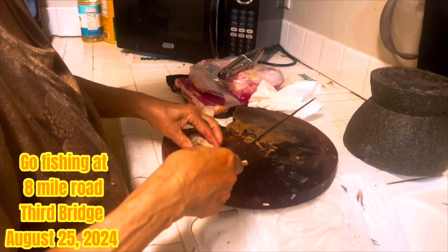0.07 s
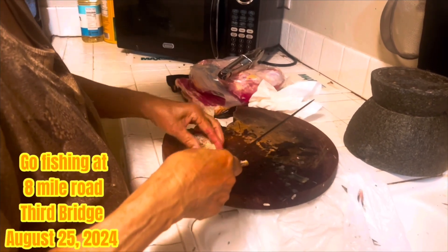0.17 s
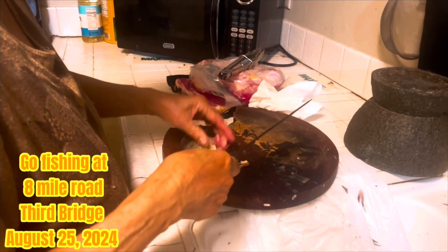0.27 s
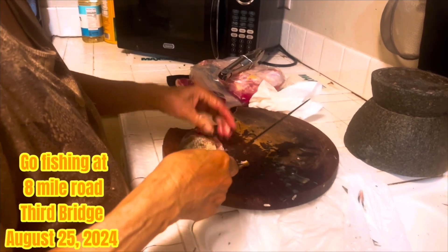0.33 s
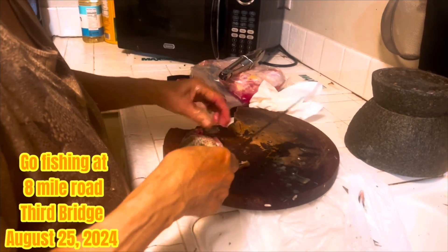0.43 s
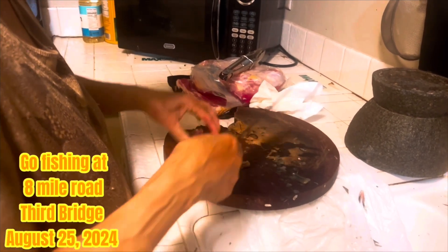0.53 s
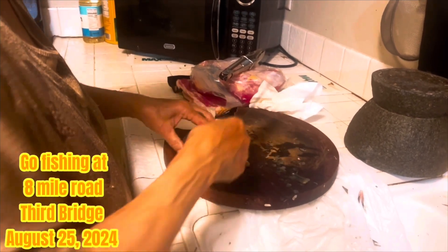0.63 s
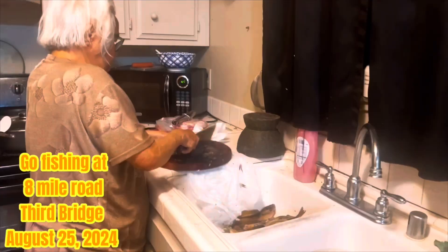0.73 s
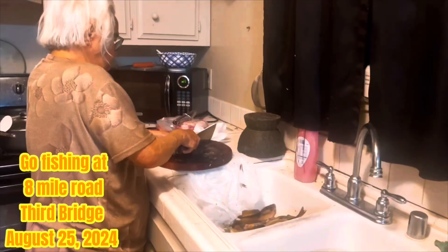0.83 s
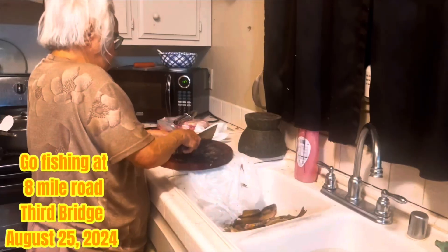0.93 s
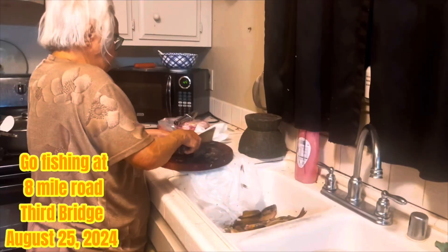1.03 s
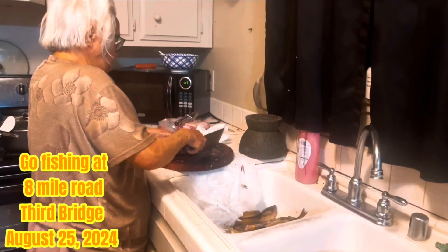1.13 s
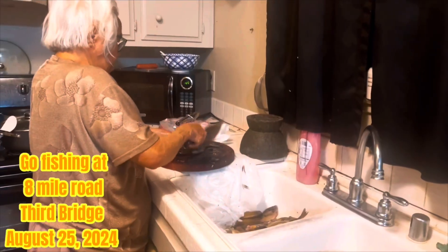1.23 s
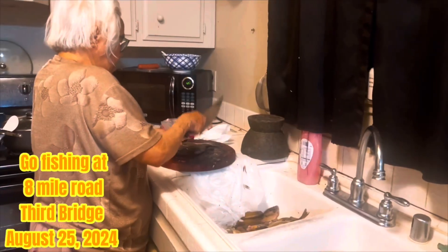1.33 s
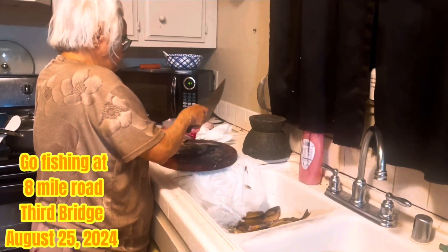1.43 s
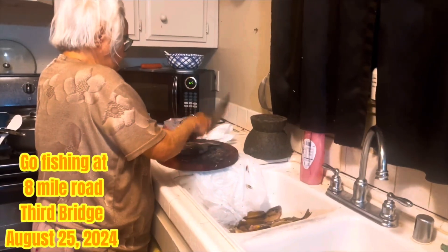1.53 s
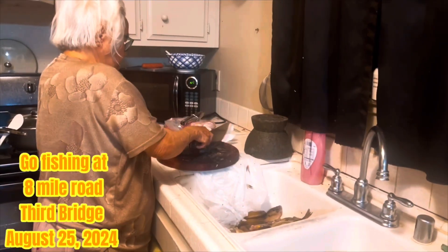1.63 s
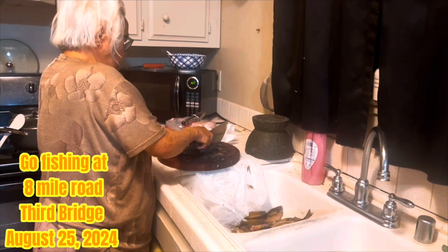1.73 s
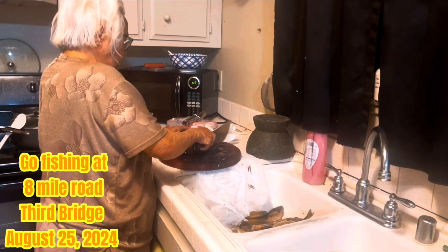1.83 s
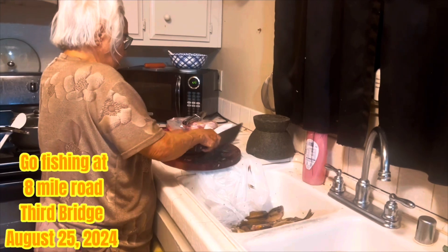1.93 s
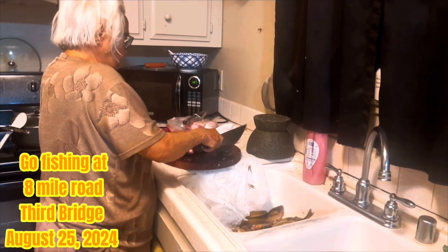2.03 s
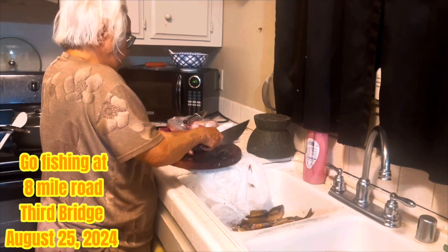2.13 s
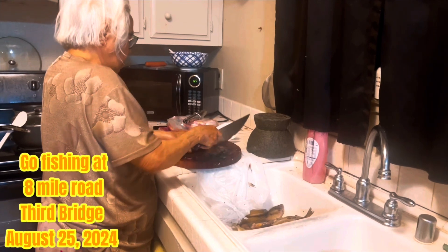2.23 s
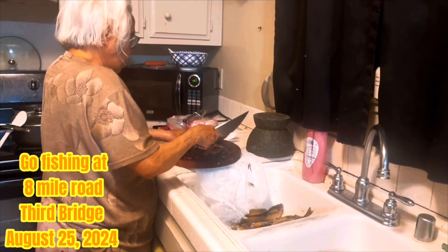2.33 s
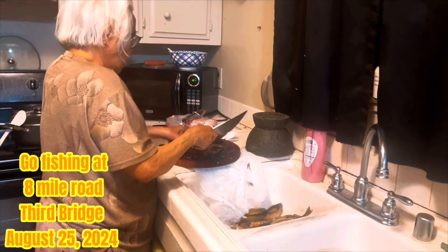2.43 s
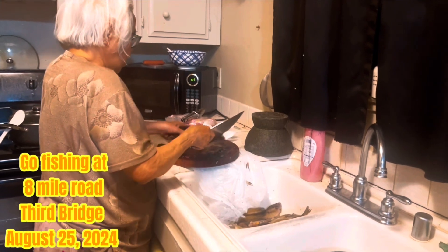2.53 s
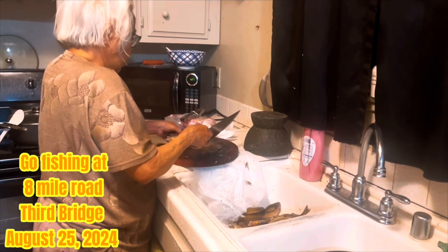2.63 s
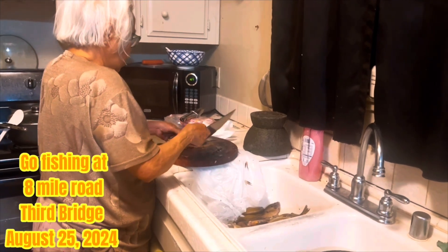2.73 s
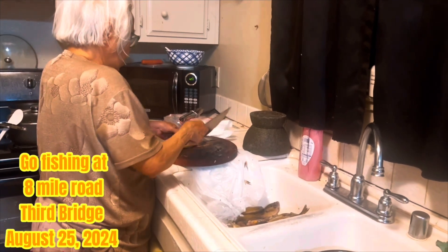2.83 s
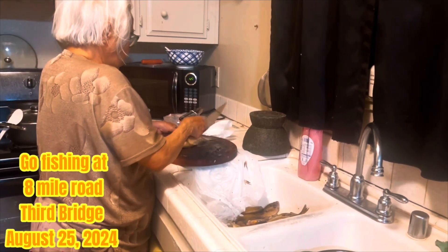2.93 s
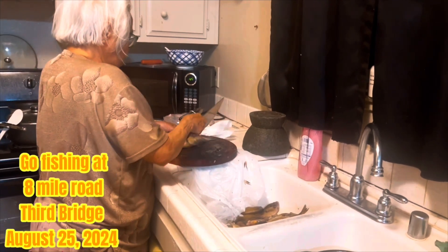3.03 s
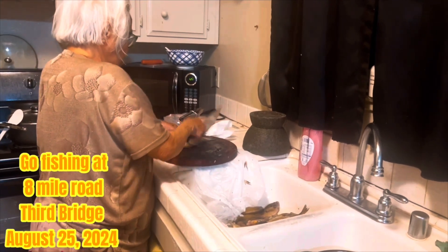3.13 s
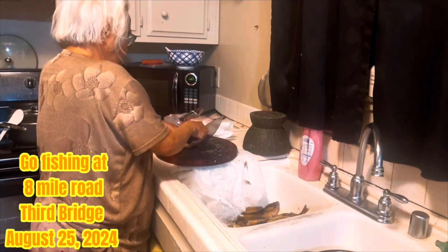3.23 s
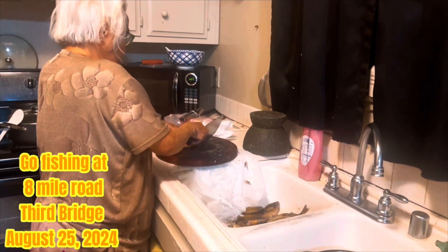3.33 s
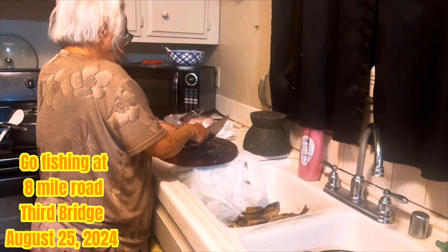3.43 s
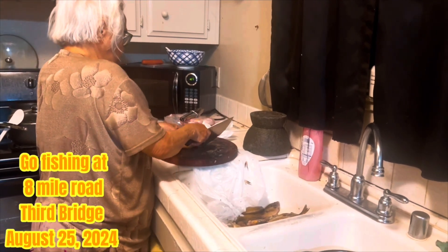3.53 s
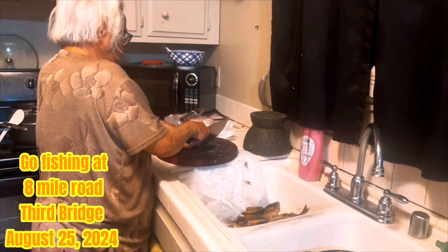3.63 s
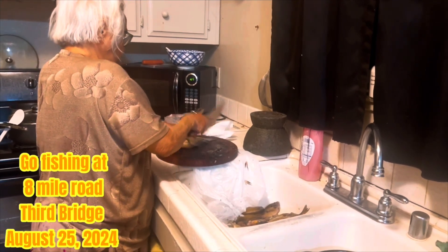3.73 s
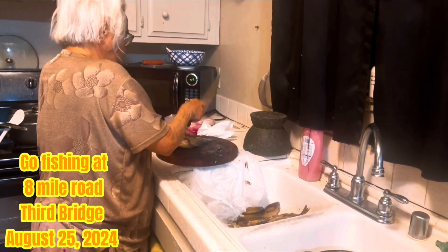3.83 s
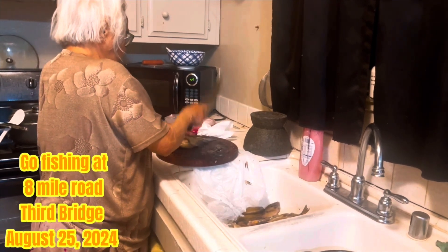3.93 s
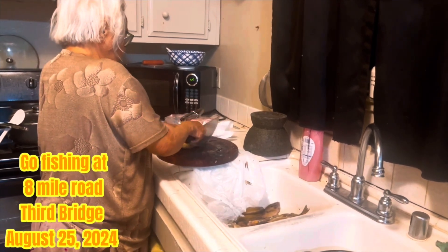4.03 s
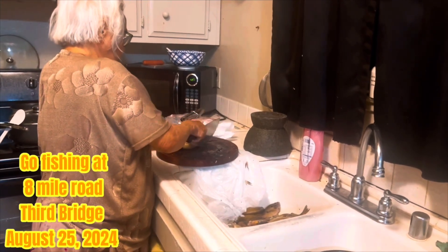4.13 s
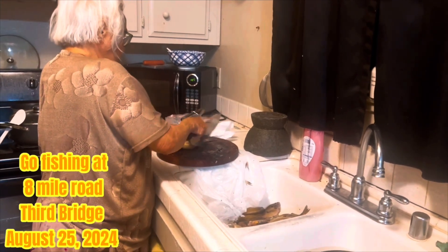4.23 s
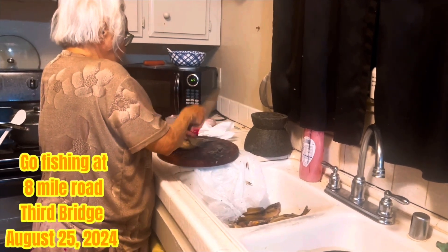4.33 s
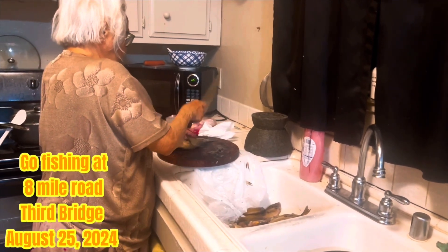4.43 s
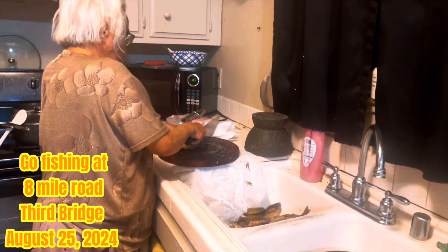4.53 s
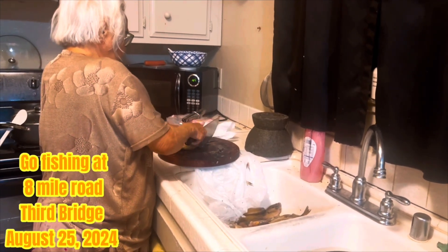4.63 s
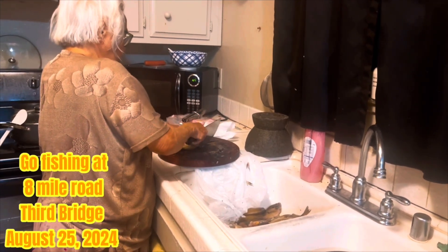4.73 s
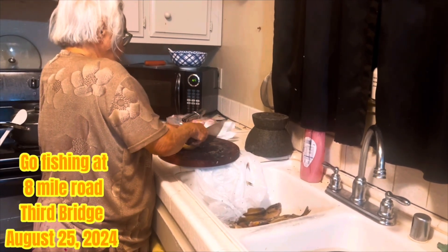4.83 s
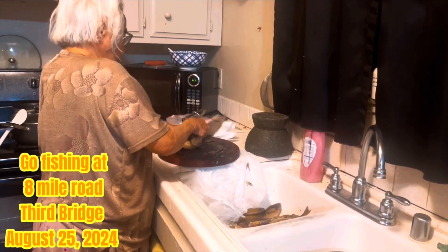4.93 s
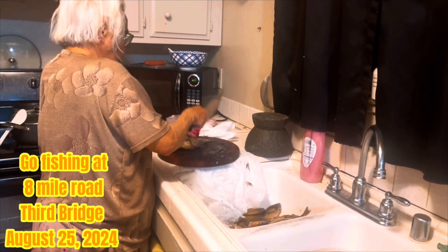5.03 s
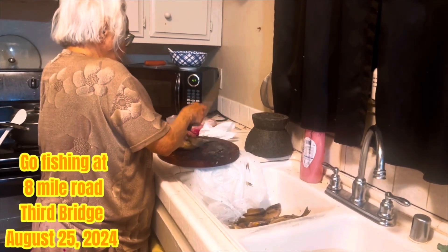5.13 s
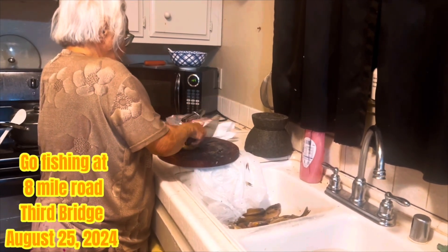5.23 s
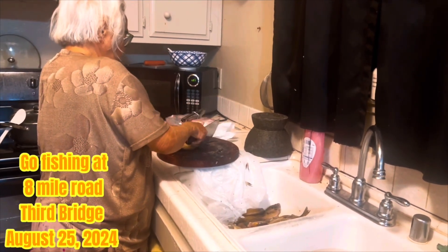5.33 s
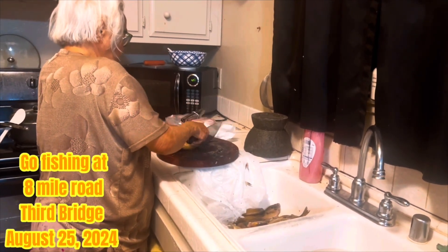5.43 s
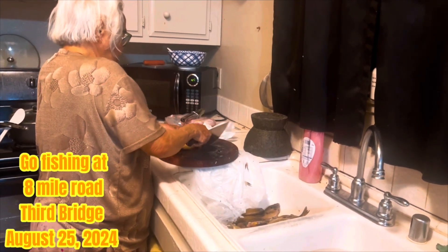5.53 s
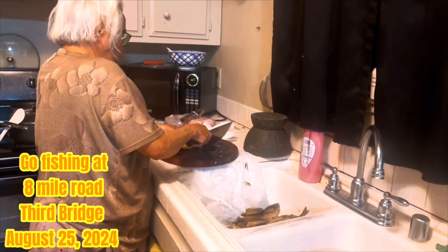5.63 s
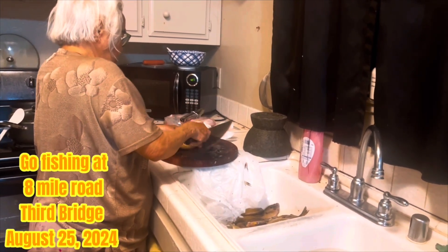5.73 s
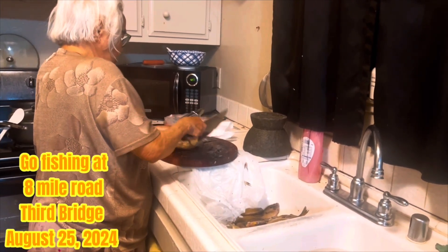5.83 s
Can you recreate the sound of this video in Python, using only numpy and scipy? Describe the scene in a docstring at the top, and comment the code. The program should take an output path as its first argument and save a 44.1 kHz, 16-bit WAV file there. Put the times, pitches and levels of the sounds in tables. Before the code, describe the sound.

Two faint, wet swishes open the sound as a hand slides small fish over a wooden board. At about 0.8 seconds a kitchen knife lands a moderate chop, and at 1.6 seconds a much harder one. Each blow is a tiny crunch of skin and bone with a sharp wooden knock and a counter thud, leaving dishes faintly ringing. A lull follows, with a few light touches around 2.5 seconds. A softer, duller chop comes at 3.1 seconds, then three loud ones at 4.0, 4.5 and 5.2 seconds. Shortly after each blow the blade scrapes the wood quietly with a thin, gritty rasp, longest at about 5.5 seconds. Everything is heard close, with the short, hard echo of a small tiled kitchen. Underneath lie a faint low rumble that rises with each blow and a very soft hiss.

```python
"""In a small tiled kitchen a hand slides small fish over a wet, round wooden board in two soft swishes.
Then a knife chops six times: each blow crunches through skin and bone, knocks the board, thumps the
counter and leaves the things on it ringing. After each blow the blade scrapes the wood, sticking and
slipping; knife and fingers touch down lightly in the gaps. Under it all lie a low rumble, stirred up
by every blow, and a faint hiss that swells twice."""
import sys
import numpy as np
from scipy import signal
from scipy.io import wavfile

SR = 44100
rng = np.random.default_rng(int(sys.argv[2]) if len(sys.argv) > 2 else 0)


def transcribe(signal):
    """Save signal, clipped to [-1, 1], as a 16-bit WAV file at the path in sys.argv[1]."""
    frames = np.atleast_2d(signal).T
    limited = np.clip(frames, -1, 1)
    pcm = np.round(limited * 32767).astype(np.int16)
    wavfile.write(sys.argv[1], SR, pcm)


N = 258867
TIME = np.arange(N) / SR
BANDS = 31.25 * 2 ** (np.arange(28) / 3)   # third-octave centres in Hz

# The knife blows. Each row: start in seconds, seconds through the fish, force in dB, trims in dB for
# counter thud, board body, wooden knock and bone snap, snap pitch in Hz, then trims in dB for
# steel edge, room and after-ring.
BLOWS = [(0.7605, 0.0033, -13.5, -1.5, -3.5, -3.5, -1, 2690, -7.5, 3, 18.5),
         (1.565, 0.0072, -1.5, -3.5, -2.5, -6, 2, 1900, -7, 1, 3.5),
         (3.1490, 0.0064, -13, 10.5, 4, -2.5, -2, 2230, -1, 1, 0),
         (3.9877, 0.0022, -0.5, 3, 6, -0.5, -2, 2327, 3, 1.5, 1),
         (4.5128, 0.0031, -1.5, 2, 1, -0.5, 0, 2446, -1, 1, 4.5),
         (5.2206, 0.0012, 0, -4, -1, -5.5, 0.5, 3053, -8.5, 3, 2.5)]
# The stereo image of the two microphone ports. Each row: frequency in Hz, left-right likeness
# from 0 to 1, left minus right in dB.
STEREO_IMAGE = [(60, 1, 0.5), (200, 0.95, 2.6), (500, 0.75, 1.5), (1200, 0.6, 1.5), (2210, .9, -0.17),
                (4000, .94, -0.9), (7000, 0.97, 0), (15000, 0.97, 1)]


def chopping(bands, crunch_db=-20, crunch_rise_db=16):
    """The edge crunches through skin and bone, swelling for a few milliseconds, then hits the board."""
    # Skin and bone giving way. Each row: frequency in Hz, relative level in dB per third octave.
    crunch_colour = [(200, -32), (1000, -6.5), (2200, 1.5), (4500, -6.5), (8000, -2), (11500, -2.5),
                     (16000, -7)]
    crunch = coloured(bands, crunch_colour)
    out, length = np.zeros((2, N)), int(1.6 * SR)
    for s, through_s, force_db, *tone in BLOWS:
        start, cut = round(s * SR), max(round(through_s * SR), 1)
        bite = from_db(force_db + crunch_db + np.linspace(-crunch_rise_db, 0, cut))
        add(out, s, bite * crunch[:, start:start + cut])
        add(out, s + through_s, from_db(force_db) * board_hit(bands[..., start:start + length], *tone))
    return out


def board_hit(bands, thud_db, body_db, knock_db, snap_db, snap_hz, edge_db, wet_db, after_db,
              bone_db=-5, bone_t60=0.015, build_cycles=0.43, room_build_s=0.0016,
              spread_db=0.5, detune=0.0033):
    """The blade lands: bone pings, a crack fills the room, the board sounds and the dishes ring on."""
    # The noise of a hit, per third octave. Each row: frequency in Hz, crack level in dB,
    # room level in dB, room t60 in seconds, after-ring level in dB.
    crack_and_tail = [(35, -19, -33.5, 0.079, -62), (66, -26, -29, 0.64, -42.5), (136, -22, -32, 0.19, -46),
                      (248, -25.5, -26, 0.24, -45), (454, -26, -23.5, 0.15, -47),
                      (710, -26.5, -24.5, 0.34, -50.5), (950, -19, -20, .27, -51),
                      (1280, -17, -19, 0.26, -52.5), (2200, -12.5, -24, .29, -53),
                      (2890, -19, -25, 0.29, -56.5), (3800, -25.5, -32.5, 0.095, -62.5),
                      (4930, -28, -35, 0.3, -62.5), (7960, -20, -33, 0.28, -65),
                      (11200, -22, -32, 0.24, -69), (16470, -25.5, -39, .16, -91)]
    # Modes of board and counter. Each row: frequency in Hz, level in dB, t60 in seconds.
    board_modes = [(67.6, -16, 0.29), (83, -25, .22), (100.3, -27, 0.47), (148.2, -31.5, 0.63),
                   (190.8, -23.5, 0.11), (206.9, -22.5, 0.14), (245.8, -12.5, 0.14), (335.7, -21, 0.16),
                   (413, -23, .25), (470.5, -22.5, 0.18), (566, -18, 0.12), (595, -19, 0.091),
                   (653.4, -19, 0.19), (674, -24.5, .2), (760, -25.5, 0.2), (794, -18.5, 0.26),
                   (829, -13.5, 0.18), (807, -19, .14), (866, -13, 0.15), (908, -23.5, 0.29),
                   (1008, -20.5, 0.27), (1064, -25, 0.07), (1120, -24, 0.078), (1182, -23, 0.18),
                   (1320, -22.5, 0.079), (1553, -19.5, 0.15), (1770, -31, 0.21), (2107, -12.5, 0.079),
                   (2380, -17, 0.0061), (3090, -11, 0.013)]
    # Microwave case and dishes, shaken through the counter. Each row: frequency in Hz,
    # level in dB, t60 in seconds.
    kitchenware_modes = [(80.7, -48, 1.9), (163, -52, 1.6), (215.3, -56, 1.7), (430.7, -53, 1.4),
                         (576, -57, 1.7), (753.7, -62, 1.6), (855.9, -66, 1.8), (888.2, -61, 2.4),
                         (995, -62, 1.3)]
    t, out = TIME[:bands.shape[-1]], np.zeros(bands.shape[1:])
    colour = [(80, thud_db), (250, body_db), (450, 0), (800, knock_db),
              (snap_hz, snap_db), (5000, 0), (10000, edge_db)]
    out += from_db(bone_db + snap_db) * np.sin(2 * np.pi * snap_hz * t) * fade(t, bone_t60)
    for hz, band in zip(BANDS, bands):
        crack_db, room_db, room_t60, ring_db = at_hz(crack_and_tail, hz)
        crack = from_db(crack_db) * fade(t, t60=0.029)
        room = from_db(room_db + wet_db) * fade(t, room_t60) * rise(t, room_build_s)
        after_ring = from_db(ring_db + after_db) * fade(t, t60=0.86)
        attack = rise(t, build_cycles / hz)   # lows take longer to build
        envelope = attack * np.sqrt(crack ** 2 + room ** 2 + after_ring ** 2)
        out += from_db(at_hz(colour, hz)) * envelope * band
    for hz, db, t60 in board_modes:
        # Every blow lands on another spot, so level and pitch vary a little.
        strength = from_db(db + at_hz(colour, hz) + spread_db * rng.normal())
        port_lag = np.arccos(likeness(hz)) * rng.choice([-1, 1])   # reaches the ports out of step
        phase = 2 * np.pi * rng.random() + port_lag * np.array([[.5], [-.5]])
        mode = np.sin(2 * np.pi * hz * (1 + detune * rng.normal()) * t + phase)
        out += pan(hz) * strength * mode * fade(t, t60) * rise(t, build_cycles / hz)
    for hz, db, t60 in kitchenware_modes:
        out += from_db(db + after_db) * np.sin(2 * np.pi * hz * t) * fade(t, t60)
    return out


def scraping(bands, slips_per_s=180, rough_db=2.0, ring_db=-0.5, grit_db=-8, wood_lead_s=0.082):
    """The edge sticks and slips on the wood: uneven friction rings the blade and rasps in the board."""
    # Strokes over the board. Each row: moment the edge bites in seconds, hold in seconds,
    # steel hiss in dB, wood rasp in dB.
    scrapes = [(1.04, 0.043, -50.5, -52), (1.889, 0.036, -64, -56), (3.29, 0.045, -72.5, -65),
               (4.14, 0.0435, -62.5, -59), (4.812, 0.02, -54.5, -69), (5.455, 0.14, -52, -47.5)]
    # Resonances of the steel. Each row: frequency in Hz, width in Hz, relative level in dB.
    blade_modes = [(1000, 50, -2), (1620, 70, -7), (2640, 110, -9), (3625, 22, -5), (4675, 28, 2),
                   (5760, 130, -6), (6850, 150, -11), (7080, 45, -4), (8020, 26, -4), (8490, 45, 3),
                   (8770, 30, -5), (9680, 30, -3), (11200, 130, -11), (12430, 30, -7)]
    # Bright steel grit and darker wood rasp. Each row: frequency in Hz, relative level
    # in dB per third octave.
    grit_colour = [(1500, -50), (3000, 1.5), (5000, -3.5), (8500, 16), (11500, -28.5), (13500, -24),
                   (16000, -30)]
    rasp_colour = [(100, -6), (450, -6), (720, -7), (1000, 3), (1250, -5.5), (1650, 0.5), (2100, -15),
                   (2700, -6), (4000, -14), (9000, -37)]
    shape = dict(rise_db_per_s=421, fall_db_per_s=290, sag_db_per_s=8.5)
    steel, wood, blade = np.zeros((3, N))
    for s, held_s, steel_db, wood_db in scrapes:
        steel += from_db(steel_db) * swell(s, held_s, **shape)
        wood += from_db(wood_db) * swell(s - wood_lead_s, held_s + wood_lead_s, **shape)
    slips = from_db(rough_db * np.interp(TIME * slips_per_s, np.arange(N), rng.standard_normal(N)))
    friction = steel * slips * rng.standard_normal(N)
    for hz, width, db in blade_modes:
        blade += from_db(db) * resonate(friction, hz, width)
    blade_power = sum(from_db(db) ** 2 * np.pi * width / SR for _, width, db in blade_modes)
    grit = from_db(grit_db) * steel * coloured(bands, grit_colour)
    rasp = wood * coloured(bands, rasp_colour)
    return from_db(ring_db) * blade / np.sqrt(blade_power) + slips * (grit + rasp)


def touches(bands, attack_s=0.00085, build_cycles=1.7, contact_t60=0.1, room_db=-7, room_t60=0.33):
    """Knife and fingers touch down lightly, each a short burst that dies away in the room."""
    # Light contacts. Each row: start in seconds, level in dB, centre in Hz, width in octaves.
    contacts = [(0.057, -67, 10870, 0.46), (0.666, -57, 940, 0.27), (0.678, -43.5, 87, 0.25),
                (0.973, -37, 340, .55), (1.084, -51.5, 7480, 0.2), (2.364, -70, 4000, 3),
                (2.53, -71.5, 8000, 0.72), (2.572, -62, 1320, 1), (2.611, -51.5, 695, 2.56),
                (3.644, -57, 3850, 0.57), (4.356, -62.5, 10500, .3), (5.748, -64.5, 9510, .5)]
    out, t = np.zeros((2, N)), TIME[:SR // 2]
    decay = np.hypot(fade(t, contact_t60), from_db(room_db) * fade(t, room_t60))
    for s, db, hz, octaves in contacts:
        gains = np.exp(-.5 * (np.log2(BANDS / hz) / octaves) ** 2).astype(np.float32)
        start = rng.integers(N - len(t))
        burst = rms_one(np.tensordot(gains, bands[..., start:start + len(t)], 1))
        add(out, s, from_db(db) * burst * decay * rise(t, attack_s + build_cycles / hz))
    return out


def sliding(bands):
    """A hand pushes the fish over the wet board in short swishes."""
    # The pushes. Each row: peak time in seconds, hold in seconds, level in dB.
    slides = [(0.0, 0.017, -63), (.2, 0.066, -60)]
    # Fish on wet wood. Each row: frequency in Hz, relative level in dB per third octave.
    swish_colour = [(1000, -23.5), (2500, -27), (3800, -5.5), (5600, -2), (8000, -8), (11500, -30),
                    (14000, -26)]
    push = sum(from_db(db) * swell(s, held_s, rise_db_per_s=417.5, fall_db_per_s=169)
               for s, held_s, db in slides)
    return push * coloured(bands, swish_colour)


def early_echoes(x, above_hz=1200):
    """Tiles, microwave and cupboard throw the short waves back, which combs the treble."""
    # Hard surfaces near the board. Each row: delay in seconds, gain.
    reflections = [(.0021, 0.16), (.0047, -0.19), (.0083, .36)]
    bass, treble = butter(x, above_hz, "low"), butter(x, above_hz, "high")
    combed = treble.copy()
    for delay, gain in reflections:
        add(combed, delay, gain * treble)
    combed /= np.sqrt(1 + sum(gain ** 2 for _, gain in reflections))
    return butter(bass, above_hz, "low") + butter(combed, above_hz, "high")


def background(bands, rumble_db=-67.5, shake_db=-48, shake_t60=2.5, hiss_db=-82):
    """A low rumble that each blow stirs up along with its after-ring, and a hiss that comes and goes."""
    # Swells of hiss. Each row: peak time in seconds, hold in seconds, level in dB.
    hiss_swells = [(0.0, 0.5, -74.5), (3.1, 1.4, -73.5)]
    # Deep rumble and airy hiss. Each row: frequency in Hz, relative level in dB per third octave.
    rumble_colour = [(25, -19.5), (45, -9), (68, 6.5), (120, -9), (200, -4), (400, -9.5), (800, -18),
                     (2000, -39)]
    hiss_colour = [(200, -7), (700, -0.5), (1300, -0.5), (2700, 1.5), (4000, -12), (7000, -5),
                   (11500, -8.5), (14000, -19.5)]
    shakes = [from_db(shake_db + force_db + after_db) * (TIME >= s) * fade(np.abs(TIME - s), shake_t60)
              for s, _, force_db, *_, after_db in BLOWS]
    swells = [from_db(db) * swell(s, held_s, rise_db_per_s=26.5, fall_db_per_s=24)
              for s, held_s, db in hiss_swells]
    rumble = np.hypot(from_db(rumble_db), np.linalg.norm(shakes, axis=0))
    hiss = np.hypot(from_db(hiss_db), np.linalg.norm(swells, axis=0))
    return rumble * coloured(bands, rumble_colour) + hiss * coloured(bands, hiss_colour)


def noise_bands():
    """Third-octave stereo noises, each as wide and as off-centre as the two ports hear it."""
    white, bands = rng.standard_normal((2, 2, N)), []
    for k, hz in enumerate(BANDS):
        mid, side = butter(white[k % 2], [hz / 1.13, hz * 1.13], "band")
        band = np.sqrt(1 + likeness(hz)) * mid + np.sqrt(1 - likeness(hz)) * side * [[1], [-1]]
        bands.append((rms_one(band) * pan(hz)).astype(np.float32))
    return np.array(bands)


def coloured(bands, colour):
    """Steady noise of a given colour, rms 1."""
    gains = from_db(at_hz(colour, BANDS)).astype(np.float32)
    return rms_one(np.roll(np.tensordot(gains, bands, 1), rng.integers(N), axis=-1))


def likeness(hz):
    """Left-right correlation at a frequency."""
    return np.clip(at_hz(STEREO_IMAGE, hz)[0], 0, 1)


def pan(hz):
    """Left and right gains at a frequency."""
    return from_db(at_hz(STEREO_IMAGE, hz)[1] * np.array([[.5], [-.5]]))


def swell(s, held_s, rise_db_per_s, fall_db_per_s, sag_db_per_s=0):
    """An envelope that climbs to 1 at time s, holds with an optional sag, then dies away."""
    t = TIME - s
    attack_db = rise_db_per_s * np.minimum(t, 0)
    sag_db = sag_db_per_s * np.clip(t, 0, held_s)
    release_db = fall_db_per_s * np.maximum(t - held_s, 0)
    return from_db(attack_db - sag_db - release_db)


def rise(t, attack_s):
    return 1 - np.exp(-t / attack_s)


def fade(t, t60):
    return np.exp(-np.log(1000) * t / t60)


def butter(x, hz, kind, order=2):
    return signal.sosfilt(signal.butter(order, hz, kind, fs=SR, output="sos"), x)


def resonate(x, hz, width_hz):
    return signal.lfilter(*signal.iirpeak(hz, hz / width_hz, fs=SR), x)


def from_db(db):
    return 10 ** (np.asarray(db) / 20)


def rms_one(x):
    return x / np.sqrt(np.mean(x ** 2) + 1e-20)


def at_hz(rows, hz):
    """A table's values at a frequency, read on a log axis."""
    knots, *columns = np.transpose(rows)
    return np.squeeze([np.interp(np.log(hz), np.log(knots), c) for c in columns])


def add(out, s, sound):
    """Mix a sound in from time s on."""
    start = round(s * SR)
    out[:, start:start + sound.shape[-1]] += sound[..., :N - start]


def scene():
    """All the work at the board, heard between hard kitchen surfaces."""
    bands = noise_bands()
    scrapes = scraping(bands)
    return scrapes + early_echoes(background(bands) + chopping(bands) + sliding(bands) + touches(bands))


def record(dry, port_hz=(10200, 13600), port_width_hz=1300, ring_hz=11300, ring_db=-2,
           shelf_hz=12600, shelf_db=-18, ceiling=0.92, cutoff_hz=15900):
    """The microphone ports ring, the very top drops off and the highest peaks overload softly."""
    left, right = dry
    for hz in port_hz:   # the right port's resonances turn only the phase of its treble
        right = 2 * signal.lfilter(*signal.iirnotch(hz, hz / port_width_hz, fs=SR), right) - right
    both = np.array([left, right])
    ringing = both + from_db(ring_db) * resonate(both, ring_hz, width_hz=700)
    top = butter(ringing, shelf_hz, "high", order=14)
    dulled = butter(ringing, shelf_hz, "low", order=14) + from_db(shelf_db) * top
    rounded = dulled / (1 + (dulled / ceiling) ** 4) ** .25
    return signal.sosfilt(signal.ellip(10, .1, 80, cutoff_hz, fs=SR, output="sos"), rounded)


dry = scene()
out = record(dry)
transcribe(out)
```